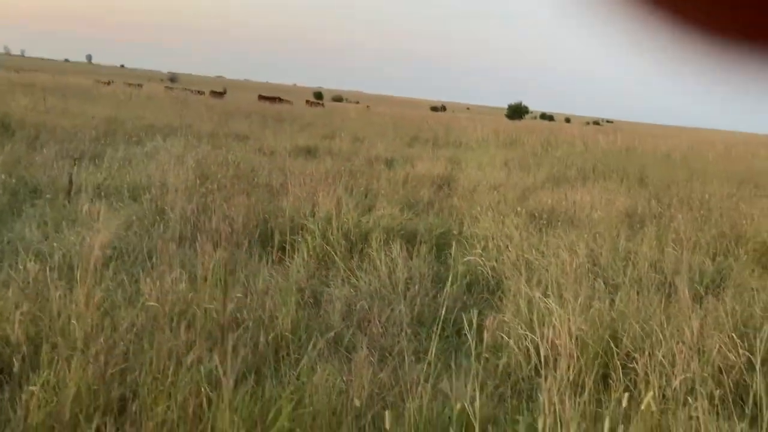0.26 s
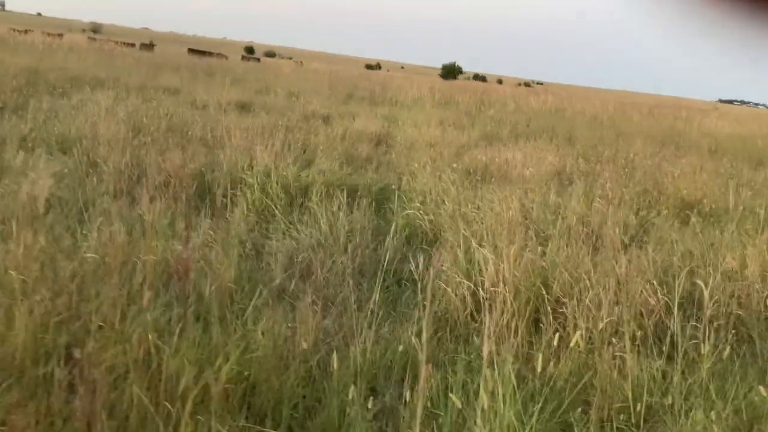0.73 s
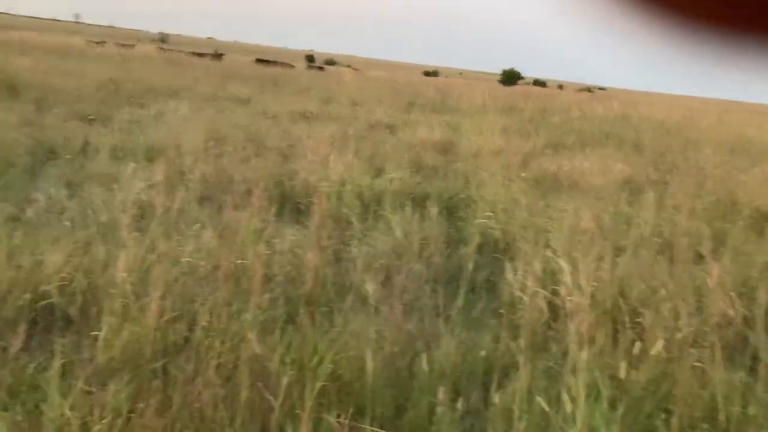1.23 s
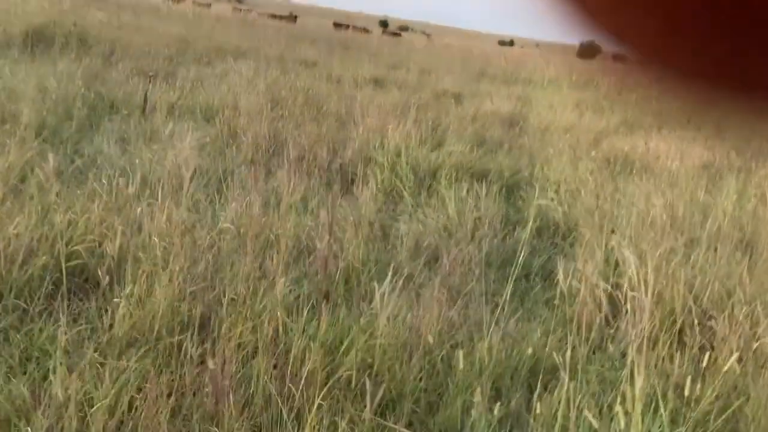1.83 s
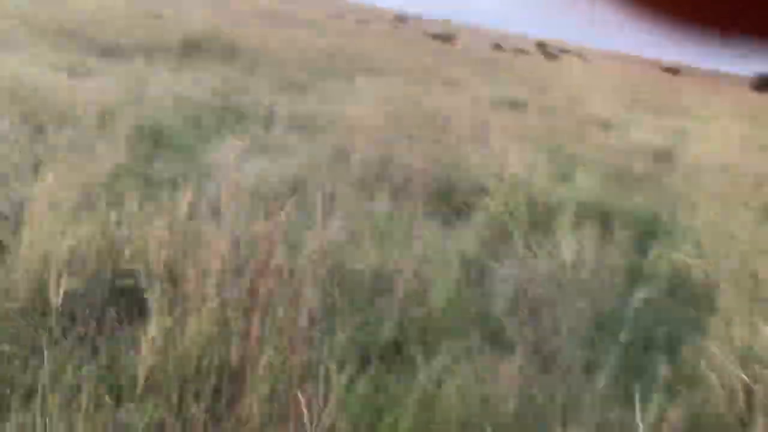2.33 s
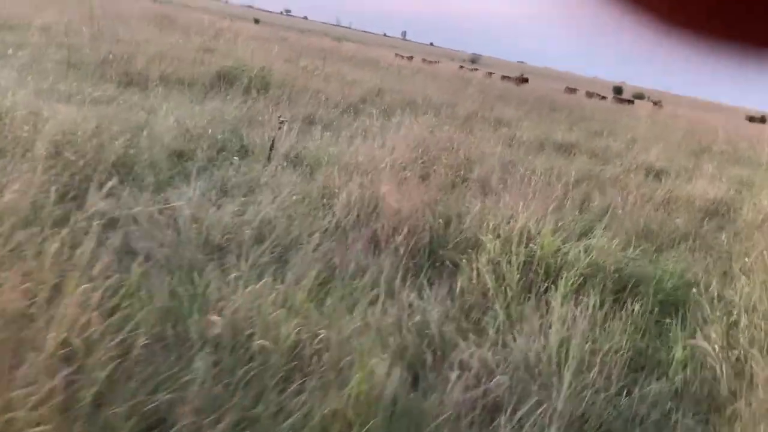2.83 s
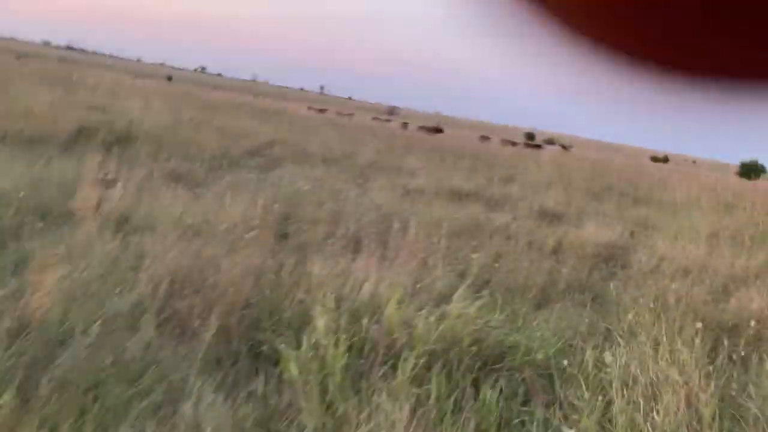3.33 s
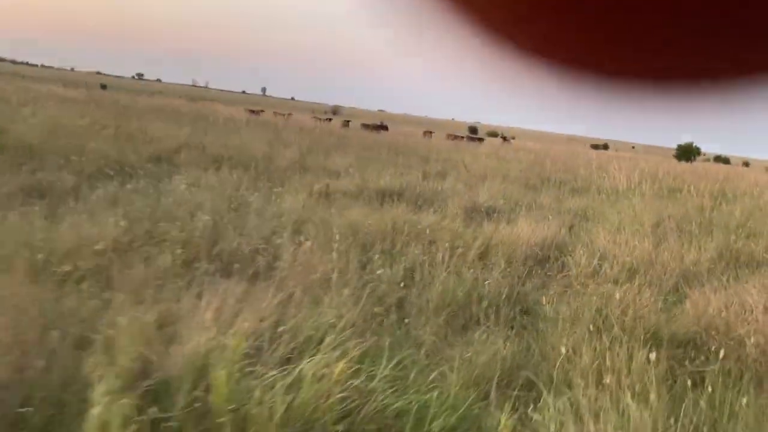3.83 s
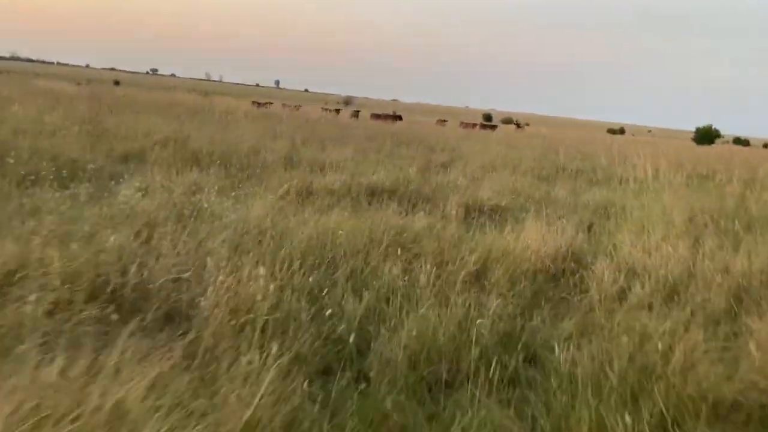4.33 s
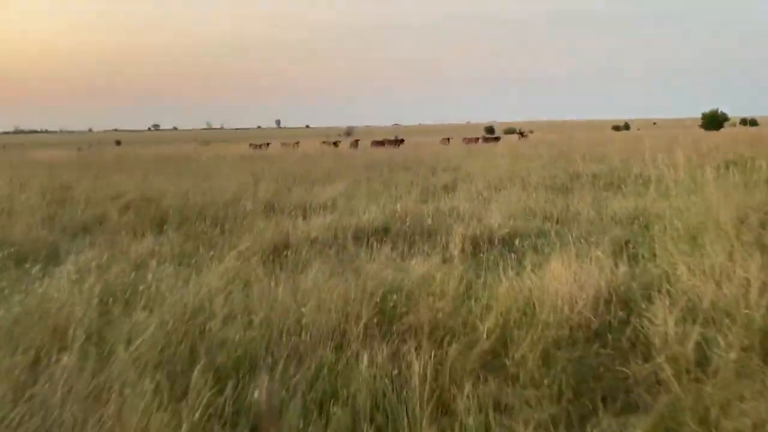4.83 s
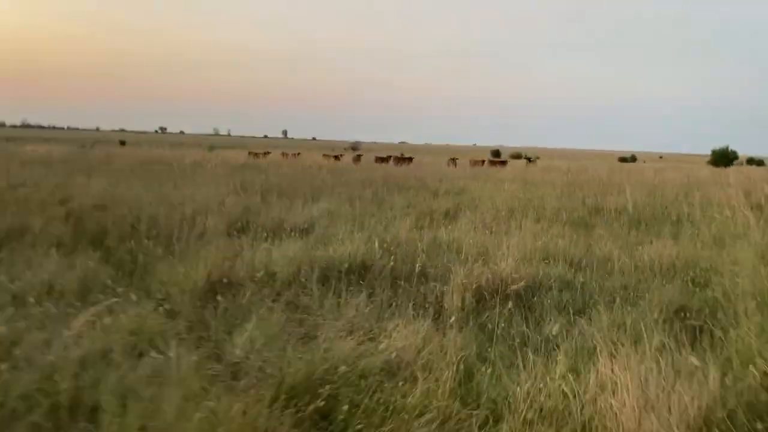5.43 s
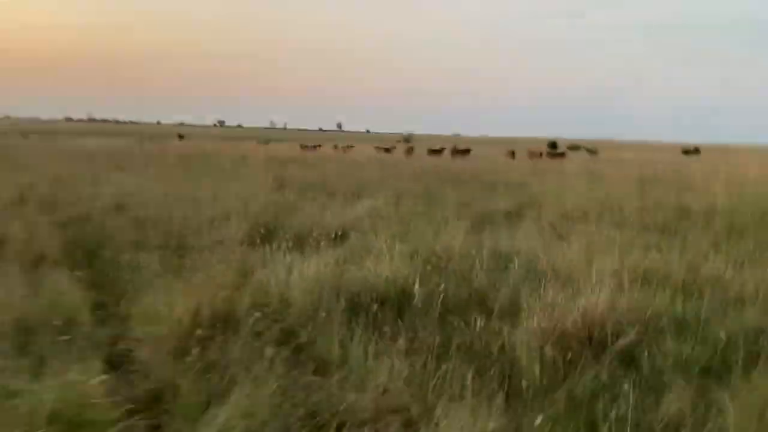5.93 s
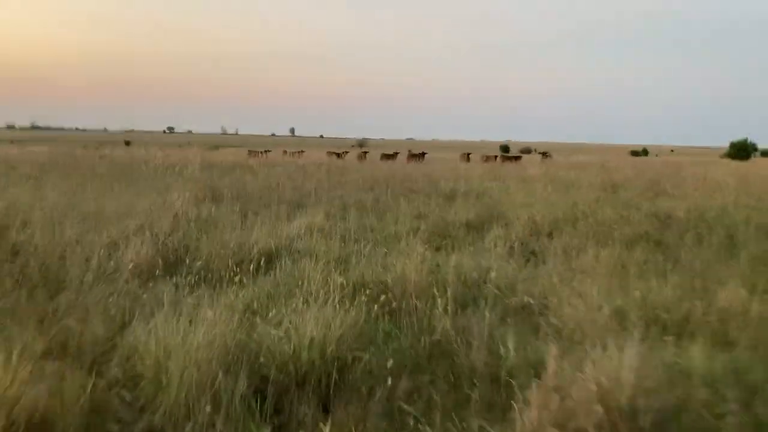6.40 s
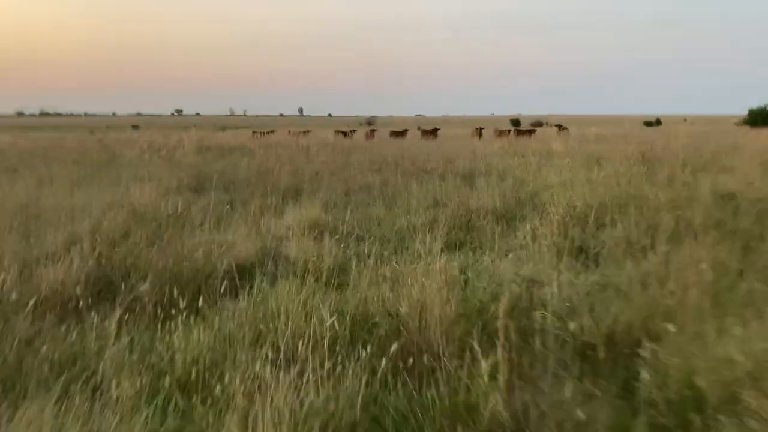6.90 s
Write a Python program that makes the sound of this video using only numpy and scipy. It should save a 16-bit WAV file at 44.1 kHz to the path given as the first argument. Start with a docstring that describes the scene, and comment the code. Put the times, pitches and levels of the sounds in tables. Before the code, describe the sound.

A single-cylinder four-stroke farm vehicle is heard from the rider's seat by a handheld stereo phone on open grassland. It begins with a slow chug, blips at about 0.3 s and falls back to a low putter. Lever ticks come at 0.6 s and between 1.0 and 1.35 s, with short scrapes and small knocks up to 1.7 s. Revs lift from 1.5 s, with chirping valve ticks near 1.9 s, and peak around 2.7 s. A shift click and scrape follow at 2.8 s, and the revs drop sharply by 3.2 s. From there the engine pulls steadily faster, its intake gulping, its case clattering and hissing, gears whining thinly. Heavy jolts and wind buffets strike at 5.1 s, knocks at 5.85 s, and another bump at 6.75 s. A steady whine joins after 6.4 s as low wind noise grows to the end, engine still pulling.

```python
"""In tall grass, on a single-cylinder four-stroke farm vehicle, with a two-port phone held by the rider:
the engine idles, blips, shifts and pulls away. The exhaust is filtered clicks, one thump a cycle; the intake
is filtered clicks that gulp just ahead of it; the engine case is pulsing noise that clatters, rings and hisses.
Gear teeth whine as sine tones, levers tick, knock and scrape as short noise bursts through resonances,
tussocks jolt the frame, and gusts of head wind buffet the microphone ports as low noise."""
import sys
import numpy as np
from scipy import signal
from scipy.fft import rfft, irfft, next_fast_len
from scipy.io import wavfile
from scipy.ndimage import uniform_filter1d

SR = 44100
rng = np.random.default_rng(int(sys.argv[2]) if len(sys.argv) > 2 else 0)


def amplitude_ratio(level_db):
    """Convert a level in decibels to the matching linear amplitude (field) ratio."""
    exponent = np.asarray(level_db, float) / 20
    return 10 ** exponent


def to_wav(sig):
    """Store sig (one row per channel, or 1-D mono) as 16-bit WAV at the path in sys.argv[1].

    Samples outside -1..1 are clipped; the rate is SR.
    """
    pcm = np.clip(np.atleast_2d(sig), -1, 1) * 32767
    pcm = np.round(pcm).astype(np.int16)
    wavfile.write(sys.argv[1], SR, pcm.T)  # frames by channels


N = 315756
TIME = np.arange(N) / SR
CRUISE_HZ = 25  # firing rate from which changes with engine speed are counted


def curves(table):
    """Columns of a time table, drawn out to one value a sample."""
    s, *columns = np.transpose(table)
    return [np.interp(TIME, s, c) for c in columns]


def colour(x, band, lag_s=0., twist=0.):
    """Filter by (Hz, dB) points, with a delay in seconds and a phase twist in radians."""
    size = next_fast_len(N + SR // 4)
    hz = np.arange(size // 2 + 1) * SR / size + 1e-3  # the offset keeps the logarithm finite
    at, db = np.transpose(band)
    gain = amplitude_ratio(np.interp(np.log(hz), np.log(at), db))
    turn = np.exp(-2j * np.pi * hz * lag_s + 1j * twist)
    return irfft(rfft(x, size) * gain * turn, size)[..., :N]


def unit(x):
    """Scale to rms 1."""
    return x / np.sqrt(np.mean(x ** 2))


def steady(x):
    """Hold the slow level at rms 1, whatever the engine speed."""
    power = uniform_filter1d(x ** 2, size=SR // 6)
    return x / np.sqrt(uniform_filter1d(power, size=SR // 6))


def walk(rate):
    """Random levels held 1 / rate s and smoothed twice; spread near 1."""
    k = int(SR / rate)
    held = np.repeat(rng.standard_normal(N // k + 1), k)
    return 1.3 * uniform_filter1d(uniform_filter1d(held, k), k)[:N]


def pulses(cycles, scatter_db):
    """A click at each whole cycle, each of its own size."""
    hit = np.diff(np.floor(cycles), prepend=np.floor(cycles[0])) > 0
    sizes = amplitude_ratio(scatter_db * rng.standard_normal(N // 500))
    return hit * sizes[np.cumsum(hit)]


def ring(x, hz, width):
    """Two-pole resonance, gain 1 at the centre; width in Hz."""
    return signal.lfilter(*signal.iirpeak(hz, hz / width, SR), x)


def wind(speed):
    """Turbulence in quick lumps, mostly shared by the two ports; it grows with speed and comes in gusts."""
    # Passband of the steady wind. Each row: frequency in Hz, level in dB.
    wind_band = [(15, -30), (35, -8), (70, 0.5), (150, -6), (300, -7.5), (500, -15.5), (900, -49),
                 (2000, -72)]
    # Passband of the gusts. Each row: frequency in Hz, level in dB.
    gust_band = [(15, -30), (35, -3), (70, 1), (150, -4.5), (250, -4.5), (350, -6), (500, -16.5),
                 (900, -38), (2000, -72)]
    # Gusts on the ports. Each row: peak time in seconds, level in dB, rise in seconds, fall in seconds.
    gust_rows = [(2.8, -22, 0.024, 0.068), (3.11, -24.5, 0.12, .04), (3.97, -21.5, 0.051, 0.042),
                 (4.7, -23, .03, 0.06), (4.86, -29, 0.042, 0.073), (5.065, -13.5, 0.028, 0.027),
                 (5.147, -10.5, 0.022, 0.03), (5.25, -28, .04, 0.098), (6.77, -23, 0.033, 0.058),
                 (7.0, -31, 0.081, 0.3)]
    still_db, db_per_m_s = -44.5, 5.5
    noise = rng.standard_normal((2, N)) * amplitude_ratio(1.36 * walk(25))
    apart = noise[1] * np.array([[1], [-1]])  # opposite on the two ports
    gusts = 0
    for s, db, rise, fall in gust_rows:
        since_peak = np.where(TIME < s, (s - TIME) / rise, (TIME - s) / fall)
        gusts = gusts + amplitude_ratio(db) * np.exp(-since_peak)
    steady_wind = unit(colour(noise[0] + 0.45 * apart, wind_band))
    buffeting = unit(colour(noise[0] + 0.29 * apart, gust_band))
    return amplitude_ratio(still_db + db_per_m_s * speed) * steady_wind + gusts * buffeting


def top_hiss():
    """A thin band of noise at the top of the treble that swells once and fades."""
    # Passband of the hiss. Each row: frequency in Hz, level in dB.
    top_band = [(12500, -30), (14300, -5), (15300, 0), (16000, -6), (16500, -60)]
    peak_s, half_s, peak_db = 2.64, 0.38, -46
    swell = np.exp(-((TIME - peak_s) / half_s) ** 2)
    return amplitude_ratio(peak_db) * swell * unit(colour(rng.standard_normal(N), top_band))


def bumps():
    """Dull jolts from the tussocks come up through the frame as low sines that die in a few swings."""
    # Jolts of the chassis. Each row: start in seconds, starting level in dB, frequency in Hz.
    jolt_rows = [(5.066, -12, 120), (5.143, -6, 125), (5.169, -11, 130), (6.746, -9, 120),
                 (6.795, -14, 120)]
    fall_s = 0.013
    out = 0
    for s, db, hz in jolt_rows:
        since = np.clip(TIME - s, 0, 1)
        out = out + amplitude_ratio(db) * np.sin(2 * np.pi * hz * since) * np.exp(-since / fall_s)
    return out


def levers():
    """Ticks: a struck ring and a short bright snap. Scrapes: a quick-rising burst of grit."""
    # Lever ticks. Each row: start in seconds, relative peak in dB, ring in Hz, share of bright snap 0-1.
    tick_rows = [(0.599, -18.5, 2390, 0.14), (0.625, -6, 2990, 0.44), (1.0162, -10, 2440, 0.05),
                 (1.2537, -15.5, 1900, 0.05), (1.3081, -19.5, 1650, 0.05), (1.3441, -17, 2660, 0.05),
                 (2.8254, -12, 2400, 0), (2.951, -25, 2220, 0.15), (3.223, -18, 2570, 0.1),
                 (3.386, -20.5, 2200, 0.1)]
    # Linkage scrapes. Each row: start in seconds, length in seconds, relative level in dB.
    scrape_rows = [(1.065, 0.035, -27.5), (1.248, 0.03, -26), (2.846, 0.052, -28.5), (3.069, 0.028, -23.5)]
    # Passband of the scrapes. Each row: frequency in Hz, level in dB.
    scrape_band = [(300, -8), (600, -2.5), (1000, -5), (2500, -7), (4000, -15), (8000, -26.5), (16000, -26)]
    ring_t60_s = 0.049
    out, t = np.zeros(N), TIME[:SR // 8]
    for s, db, hz, snap in tick_rows:
        noise = rng.standard_normal((2, len(t)))
        blow = noise[0] * np.exp(-t / 0.0016)
        body = ring(blow, hz, 2.2 / ring_t60_s) + .5 * ring(ring(blow, hz, 1300.), hz, 1300.)
        bright = noise[1] * ((t < .003) + 0.84 * np.exp(-t / 0.01))
        tick = body / np.abs(body).max() + snap * bright
        i = int(s * SR)
        out[i:i + len(t)] += amplitude_ratio(db) * tick / np.abs(tick).max()
    shape = 0
    for s, length, db in scrape_rows:
        rise = np.clip((TIME - s) / 0.0022, 0, 1)
        shape = shape + amplitude_ratio(db) * rise * np.exp(-(np.clip(TIME - s, 0, 9) / length) ** 2)
    grit = rng.standard_normal(N) * amplitude_ratio(0.75 * walk(300))
    return out + shape * unit(colour(grit, scrape_band))


def knocks():
    """Short blows of noise through a damped ring: low knocks, and high pings of the valve cover near 4.7 kHz."""
    # Blows. Each row: start in seconds, relative peak in dB, ring in Hz.
    knock_rows = [(1.207, -26, 950), (1.484, -30, 1100), (1.436, -22, 740), (1.678, -26, 1000),
                  (1.727, -20.5, 980), (4.255, -29, 4720), (4.372, -29, 4680), (4.487, -28, 4730),
                  (5.842, -16, 950), (5.877, -17.5, 920)]
    out, t = np.zeros(N), TIME[:SR // 8]
    for s, db, hz in knock_rows:
        blow = ring(rng.standard_normal(len(t)) * np.exp(-t / 0.0063), hz, 140.0)
        out[int(s * SR):][:len(t)] += amplitude_ratio(db) * blow / np.abs(blow).max()
    return out


def whine(cycles):
    """Gear tooth tones that waver with the load: some rise with the engine, one fades in at speed."""
    # Teeth of the second gear. Each row: multiple of the firing rate, relative level in dB.
    mesh_rows = [(28.6, -43), (38.1, -41.5), (44.9, -43.5)]
    # Swell of those teeth. Each row: time in seconds, gain in dB.
    mesh_load = [(3.15, -24), (3.4, 0.5), (4.5, 2), (5.3, 3.5), (5.8, 6.5), (7.16, -5)]
    tone_hz, tone_db, from_s, fade_s = 1514, -31, 6.35, 0.18
    mesh = 0
    for k, level_db in mesh_rows:
        tooth = np.sin(2 * np.pi * k * cycles + 1.2 * walk(20))
        mesh = mesh + amplitude_ratio(level_db + 3 * walk(12)) * tooth
    fade = np.clip((TIME - from_s) / fade_s, 0, 1)
    tone = np.sin(2 * np.pi * np.cumsum(tone_hz + 14 * walk(12)) / SR)
    throb = 1 + 0.54 * np.cos(2 * np.pi * (cycles - .7))  # once a cycle
    return fade * amplitude_ratio(tone_db + 2.0 * walk(30)) * throb * tone + amplitude_ratio(curves(mesh_load)[0]) * mesh


RAP_AT = .4  # share of the cycle at which the rap peaks


def case_beat(cycles, hz):
    """Strength of the clatter in the cycle: a rap at low revs, and a burst that starts with the intake."""
    burst_at, burst_fall = .62, .2  # shares of the cycle
    faster = hz - CRUISE_HZ
    phase = cycles % 1
    rap = np.clip(.45 - .1 * faster, 0, 2) * np.exp(-((phase - RAP_AT) / 0.075) ** 2)
    since = (phase - burst_at) % 1
    burst = (1.0 + .06 * faster) * np.clip(since / .04, 0, 1) * np.exp(-since / burst_fall)
    return .66 + rap + burst


def case(cycles, hz, clatter_db, hiss_db, ticking_db):
    """Valve and gear clatter beats as noise and rings panels and cover; a finer hiss of gas and grass lies above."""
    # Colour of the engine case. Each row: frequency in Hz, level in dB.
    case_band = [(150, -27), (400, -4), (560, -5), (966, 0), (1070, -1.5), (1330, -1.5), (2500, -3.5),
                 (2770, -7), (3500, -11.5), (4600, -9.5), (5550, -19), (6300, -13.5), (6960, -17),
                 (9060, -21), (10500, -20.5), (11300, -21), (13800, -20.5), (15300, -23), (16500, -77)]
    # Ringing panels. Each row: frequency in Hz, width in Hz, level in dB, dB gained per Hz of firing rate.
    panel_rows = [(874, 45, -1.5, 0.57), (950, 23, 4, 1.04), (1166.6, 13, 1.5, -1), (1304, 44, 0, 0.05),
                  (1534, 22, -2.5, 1.5), (1718, 16, -3.5, -1.5), (2036, 34, -4.5, 0.8),
                  (2400, 31, -7.5, 0.2), (1875, 55, -1.5, 0.35), (2560, 100, -28, 0.5)]
    # Ringing valve cover. Each row: frequency in Hz, width in Hz, level in dB.
    cover_rows = [(3100, 150, -6), (3870, 100, -3), (4100, 110, 0), (4350, 120, -1), (4700, 90, -3),
                  (6480, 120, -7), (7140, 120, -7), (7260, 80, -8)]
    # Clatter turning brighter or duller. Each row: time in seconds, gain of its upper part in dB.
    edge_rows = [(0, -2), (1.3, -5), (2, 1), (2.6, 2), (4.5, -1.5), (6.3, -1.5), (7.16, -5)]
    # Spells in which the cover chirps. Each row: time in seconds, gain in dB.
    chirp_rows = [(0, 2), (.4, 2.5), (.6, -2.5), (1.6, -3.5), (1.9, 6.5), (2.15, 3), (2.4, -1), (3.9, 1),
                  (4.3, 5.5), (5.1, -1), (5.4, -2), (7.16, -3)]
    beat = case_beat(cycles, hz)
    # three rows of noise: one for both ports, then one for each
    grit = amplitude_ratio(1.5 * rng.exponential(size=(3, N))) * rng.standard_normal((3, N))
    rattle = beat * grit / np.std(grit)
    panels = 0
    for at, width, db, rise in panel_rows:
        panels = panels + amplitude_ratio(db + rise * (hz - 25.5) + 2.6 * walk(3.07)) * ring(rattle, at, width)

    low = colour(rattle + amplitude_ratio(0.5) * panels, case_band) * amplitude_ratio(0.37 * walk(12))
    low = low + (amplitude_ratio(curves(edge_rows)[0]) - 1) * colour(low, [(1000, -30), (1500, 0)])
    low = signal.sosfilt(signal.butter(4, 2800, fs=SR, output="sos"), low)
    high = colour((1 + 0.84 * beat) * rng.standard_normal((3, N)) * amplitude_ratio(0.91 * walk(13)), case_band)
    high = signal.sosfilt(signal.butter(4, 2800, "high", fs=SR, output="sos"), high)

    ticking = 0
    for at, width, db in cover_rows:
        taps = amplitude_ratio(30) * pulses(cycles - RAP_AT, 7.0) * rattle.std()
        ticking = ticking + amplitude_ratio(db) * ring(taps + beat ** 3 * rattle, at, width)
    chirping_db = ticking_db + curves(chirp_rows)[0]
    return amplitude_ratio(clatter_db) * unit(low) + amplitude_ratio(hiss_db) * unit(high) + amplitude_ratio(chirping_db) * unit(ticking)


def intake(cycles, hz, level_db, snorkel_db):
    """The air box rings as the valve opens ahead of the firing and again on its echo, with a little turbulence."""
    # Passband of the air box. Each row: frequency in Hz, level in dB.
    box_band = [(120, -66), (175, -48), (205, -6), (260, 4), (300, 1.5), (345, 4), (400, -2.5), (460, -13),
                (520, -22), (650, -66), (1500, -120)]
    opens_at, lead_s = .845, .007  # valve opening as a share of the cycle; lead of the sound
    snorkel_hz, snorkel_width_hz = 469.6, 122  # upper note of the intake
    opens = colour(pulses(cycles - opens_at + 1, 1.0), box_band, -lead_s, 0.37)
    # the gulp returns along the duct 11.82 ms later, weaker at higher revs
    echo_share = np.clip(.38 - .03 * (hz - CRUISE_HZ), 0, 1)
    echo = echo_share * colour(opens, [(1, 0), (9, 0)], 0.01182, 0.12)
    rush = amplitude_ratio(-16) * unit(colour(rng.standard_normal(N), box_band))
    snorkel = ring(ring(opens, snorkel_hz, snorkel_width_hz), snorkel_hz, snorkel_width_hz)
    return amplitude_ratio(level_db) * unit(steady(opens + echo) + rush) + amplitude_ratio(snorkel_db) * steady(snorkel)


def exhaust(cycles, hz, bark_db, thud_db, shake_db):
    """Each firing thuds and barks; at speed a puff half a cycle later weakens the odd orders of the thud."""
    # Passband of the thud. Each row: frequency in Hz, level in dB.
    thud_band = [(25, -60), (50, -52), (60, -6), (66, 6), (85, 5.5), (100, 6.5), (120, -36), (140, -48),
                 (300, -120)]
    # Passband of the bark. Each row: frequency in Hz, level in dB.
    bark_band = [(75, -57), (90, -34), (105, -2), (132, 3), (146, -4), (160, -30), (185, -17), (215, -54),
                 (300, -68), (500, -120)]
    puff_share = np.clip(0.54 + 0.07 * (hz - CRUISE_HZ), 0, 1)  # size on the unfired turn, 1 = a firing
    fired = pulses(cycles, 1.0)
    thud = colour(fired + puff_share * pulses(cycles + .5, 1.0), thud_band, twist=-0.3)
    bark = colour(fired, bark_band, -0.0019, -0.18)
    # all-pass: the silencer holds back in time the tones near its own note
    bark = bark - 2 * ring(bark, 159.0, 37.0)
    # the piston shakes the frame once a crank turn, lagging .135 rad per Hz above 34.5 Hz
    shake = np.sqrt(2) * np.cos(4 * np.pi * cycles - .135 * (2 * hz - 34.5))
    return amplitude_ratio(thud_db) * unit(thud) + amplitude_ratio(bark_db) * steady(bark) + amplitude_ratio(shake_db) * shake


def ports(shared, own):
    """Lows are alike on both ports, the middle comes mostly from own, the top is late and inverted on the left."""
    # Balance of the ports. Each row: frequency in Hz, left minus right in dB.
    balance = [(500, 5), (915, -1.5), (1300, 4.5), (2400, 2.5), (6000, 4), (7500, 1), (15000, 0)]
    bottom = colour(shared, [(1100, -1.5), (2200, -9.0), (4000, -21.5)])
    top = colour(shared, [(3500, -22), (5500, -14.5), (7000, -1.0)])
    own = colour(own, [(600, -4.0), (950, -8.0), (1400, -6), (2300, -4.5), (4800, -3.5), (7000, -9.0), (16000, -34.0)])
    at, db = np.transpose(balance)
    left = bottom + own[0] - colour(top, [(1, 0), (9, 0)], .000223)
    right = bottom + own[1] + top
    return np.array([colour(left, np.c_[at, db / 2]), colour(right, np.c_[at, -db / 2])])


def law(rule, throttle, hz, speed):
    """Level in dB of a layer that follows throttle, revs and ground speed."""
    base_db, open_db, rev_db, roll_db = rule
    return base_db + open_db * throttle + rev_db * (hz - CRUISE_HZ) + roll_db * speed


def scene():
    """Engine layers share one crank; the phone's two ports hear each layer in their own way."""
    # Engine speed. Each row: time in seconds, firing rate in Hz.
    rate_rows = [(0.0, 15.62), (0.33, 23.47), (0.55, 16.7), (1.2, 16.59), (1.38, 15.84), (1.52, 16.78),
                 (1.8, 21.99), (1.95, 22.73), (2.12, 21.37), (2.68, 29.38), (2.76, 28.6), (2.8, 26.5),
                 (3.12, 25.6), (3.2, 19.27), (3.45, 20.08), (3.55, 20.4), (3.75, 21.9), (3.9, 22.4),
                 (4.0, 23.15), (4.35, 24.92), (4.5, 24.9), (4.6, 24.65), (4.9, 25.8), (5.05, 25.65),
                 (5.3, 26.35), (5.44, 26.3), (5.58, 27.0), (5.7, 27.1), (5.8, 27.9), (5.93, 28.05),
                 (6.1, 28.8), (6.2, 28.95), (6.31, 28.45), (6.43, 29.3), (6.63, 29.6), (6.8, 28.68),
                 (7.0, 30.32), (7.16, 30.21)]
    # Throttle. Each row: time in seconds, opening 0-1, level of the exhaust thud in dB.
    throttle_rows = [(0, 0.4, -17.5), (.24, 1, -23.5), (.36, 0.85, -28.5), (.6, 0, -20.5), (1.35, 0.5, -19),
                     (1.6, 0.86, -17.5), (1.83, 1, -28.5), (2.3, 0.98, -25.5), (2.69, 0.68, -21),
                     (2.74, 0.26, -18), (2.81, 1, -9), (2.86, 0.35, -15), (2.97, 0.13, -16.5),
                     (3.12, 0.7, -28), (3.27, 1, -19), (3.6, 1, -20), (4.0, 0.94, -23.5), (5.3, 1, -25.5),
                     (6.1, 0.88, -27), (7.16, 0.8, -20)]
    # Rolling. Each row: time in seconds, ground speed in m/s.
    rolling_rows = [(0, 0.5), (1.5, 1.08), (2.7, 1.2), (3.2, 1.83), (4.4, 2.5), (5.6, 3), (7.16, 4)]
    # Intake. Each row: time in seconds, relative level in dB.
    intake_rows = [(0, -35.5), (.24, -31), (.4, -34.5), (.68, -39.5), (1.3, -34.5), (1.54, -30),
                   (1.93, -24.5), (2.23, -26.5), (2.67, -23), (2.76, -28), (2.95, -34), (3.15, -36),
                   (3.22, -25), (3.4, -28.5), (3.75, -24.5), (4.95, -27.5), (5.44, -23.5), (6.46, -23),
                   (7.16, -26)]
    # Exhaust as the phone turns. Each row: time in seconds, left minus right in dB, left lead in ms.
    turn_rows = [(0, -5.5, 1.5), (1.4, -3, 2.5), (1.9, -0.5, 0.6), (2.6, -1.5, 0.5), (3.4, -1, 0.44),
                 (4, -2, 0), (7.16, -1.1, -0.45)]
    (hz,), (throttle, thud_db), (speed,) = curves(rate_rows), curves(throttle_rows), curves(rolling_rows)
    state = throttle, hz, speed
    # rules: dB at shut throttle, standstill and CRUISE_HZ; dB at full throttle; dB per Hz; dB per m/s
    bark_db = law((-24.5, 9.5, 0.48, -0.5), *state)
    shake_db = law((-29.5, 0.5, 2, 0.4), *state)
    snorkel_db = law((-47.5, 16.5, 0.26, -2.5), *state)
    clatter_db = law((-33, 1.5, 0.3946, 1.79), *state)
    hiss_db = law((-40, -0.5, .5, 2.5), *state)
    ticking_db = law((-50, 3.5, 0.94, 0), *state)
    cycles = np.cumsum(hz) / SR - .455  # share of a cycle still to run before the first firing

    near = levers() + knocks()
    metal = case(cycles, hz, clatter_db, hiss_db, ticking_db)
    machine = amplitude_ratio(2.0) * ports(metal[0] + whine(cycles) + near, metal[1:] + near)
    gulp = intake(cycles, hz, curves(intake_rows)[0], snorkel_db)
    # the right port hears the gulp louder and 0.1 ms later
    gulp = np.array([gulp * amplitude_ratio(-3.5), colour(gulp, [(1, 0), (9, 0)], .0001) * amplitude_ratio(1.5)])
    pan_db, lead_ms = curves(turn_rows)
    thump = exhaust(cycles, hz, bark_db, thud_db, shake_db)
    late_thump = np.interp(TIME - lead_ms / 1000, TIME, thump)
    thump = np.array([thump * amplitude_ratio(pan_db / 2), late_thump * amplitude_ratio(-pan_db / 2)])
    return wind(speed) + top_hiss() + bumps() + machine + gulp + thump


def top_cut(x):
    """Nothing passes above the cut-off."""
    return signal.sosfilt(signal.butter(12, 16970, fs=SR, output="sos"), x)


def record(dry):
    """The phone softly rounds the loudest peaks and cuts the treble above 16.3 kHz."""
    rounded = dry / (1 + dry ** 4) ** .25
    low_pass = signal.ellip(8, .2, 70, 16300, fs=SR, output="sos")
    finished = signal.sosfilt(low_pass, rounded)
    return top_cut(finished)


dry = scene()
out = record(dry)
to_wav(out)
```